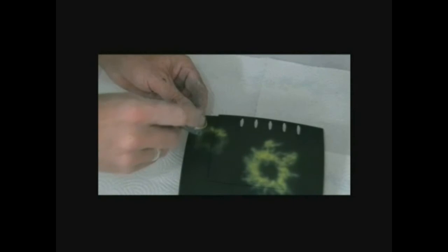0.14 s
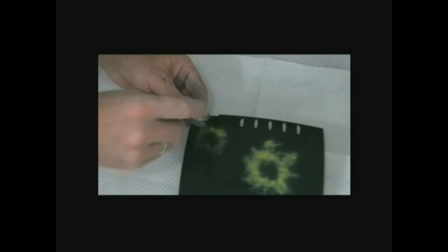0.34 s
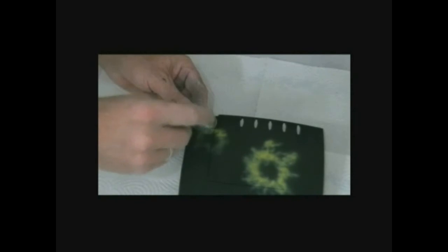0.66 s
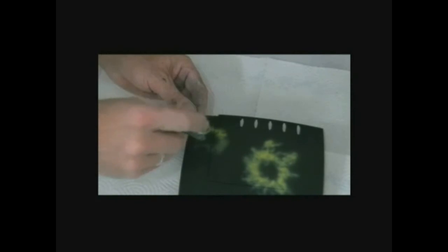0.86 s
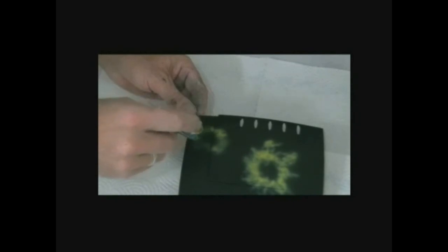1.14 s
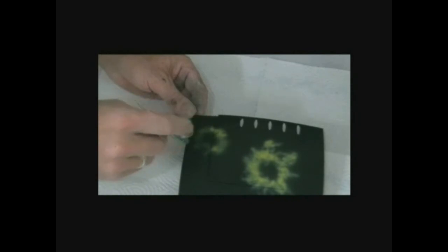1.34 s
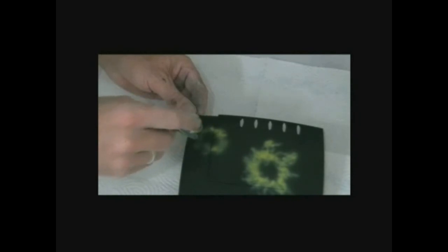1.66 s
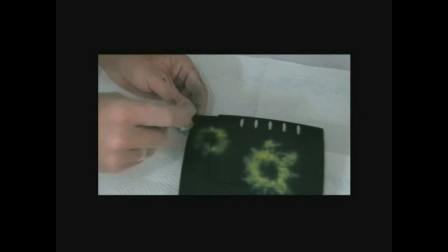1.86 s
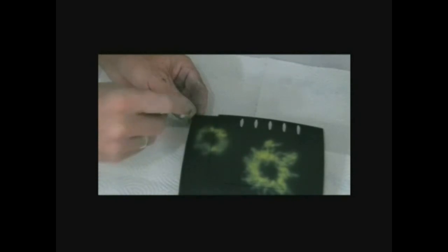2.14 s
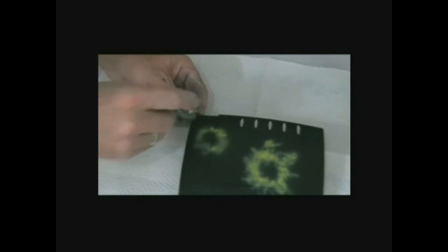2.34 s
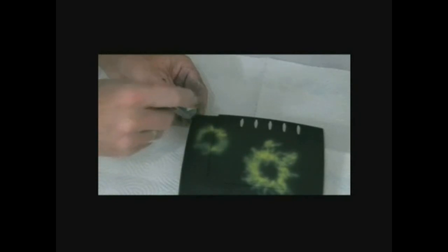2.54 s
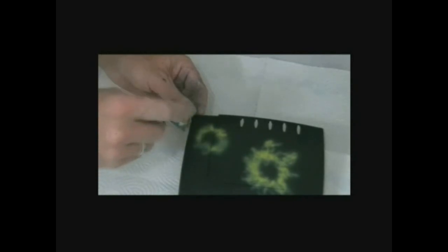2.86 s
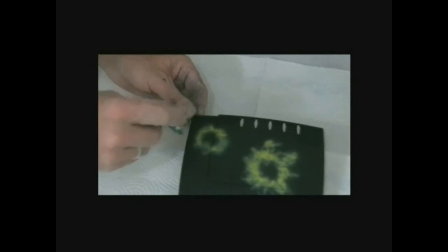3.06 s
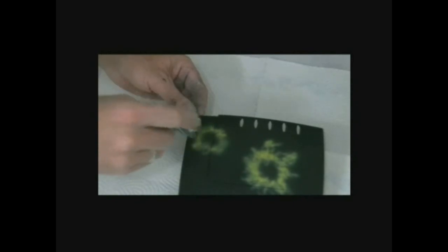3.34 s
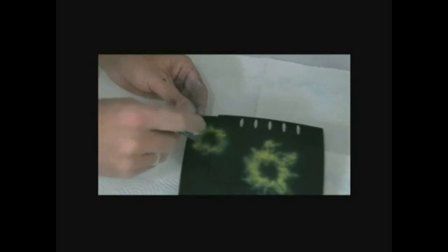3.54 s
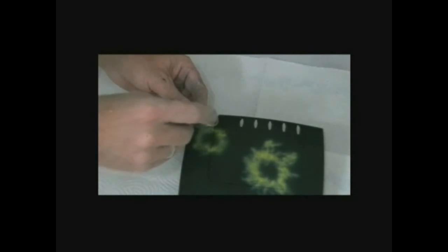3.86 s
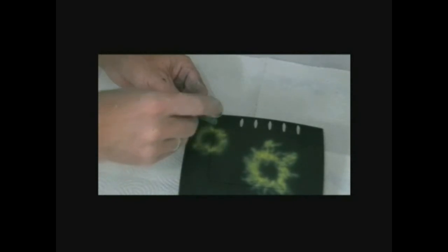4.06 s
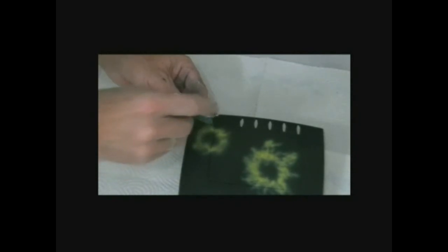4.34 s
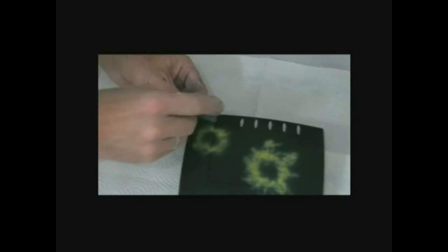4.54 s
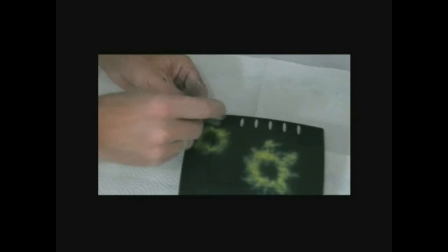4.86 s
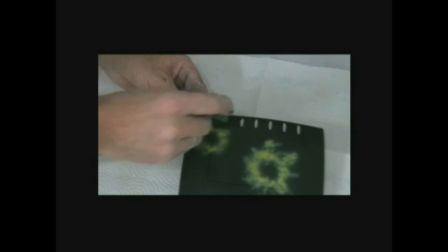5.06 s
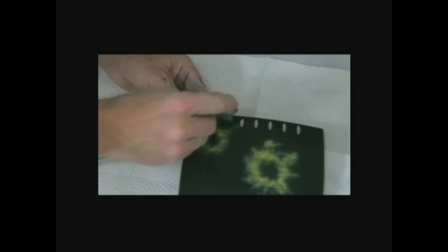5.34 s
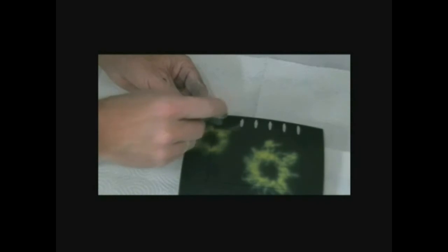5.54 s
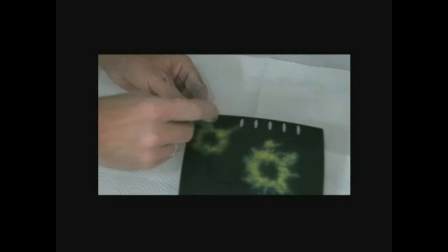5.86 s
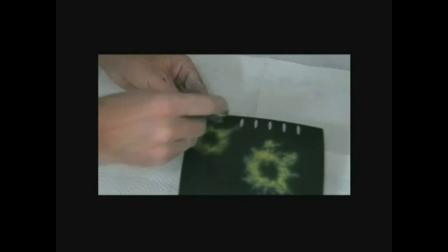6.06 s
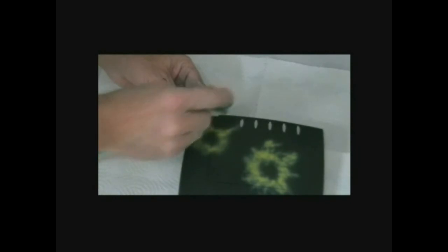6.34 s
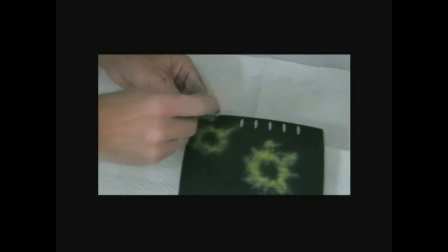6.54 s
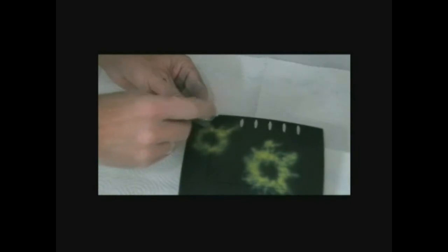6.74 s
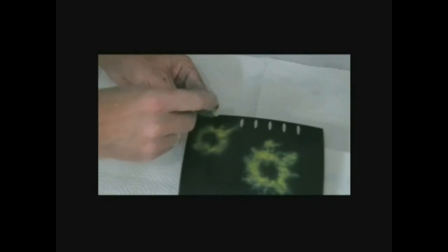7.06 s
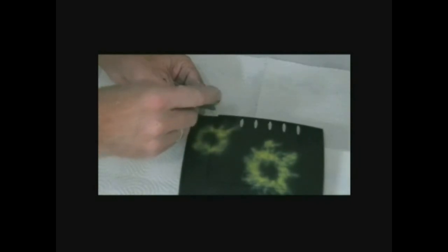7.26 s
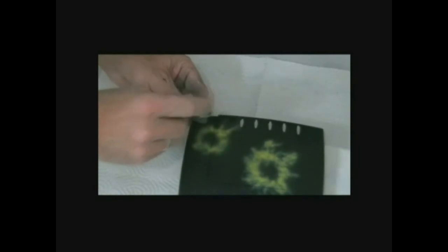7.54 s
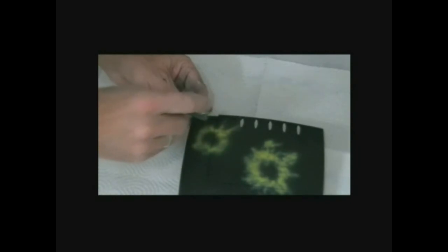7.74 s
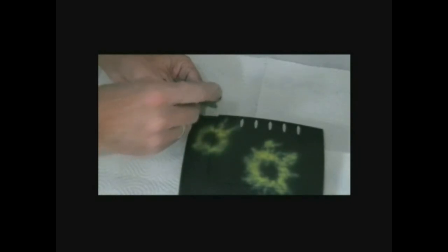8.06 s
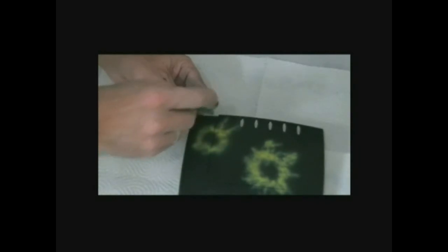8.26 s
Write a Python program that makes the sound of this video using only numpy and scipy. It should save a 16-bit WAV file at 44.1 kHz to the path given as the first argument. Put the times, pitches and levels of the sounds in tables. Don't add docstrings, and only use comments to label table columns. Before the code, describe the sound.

In a small quiet room, an airbrush sprays a long, steady, bright hiss with thin breathy whistles wavering inside it. After about four seconds it shuts off, then fires several short spurts with tiny gaps. Each spurt strikes a hollow plastic panel, adding a low-mid roar, a drumming flutter and sometimes a rasp. Close stereo pickup, with a short room tail and very faint hum beneath.

```python
import sys
import numpy as np
from scipy import signal
from scipy.fft import rfft, irfft, next_fast_len
from scipy.io import wavfile
from scipy.ndimage import uniform_filter1d, map_coordinates

SR = 44100
rng = np.random.default_rng(int(sys.argv[2]) if len(sys.argv) > 2 else 0)


def boost_factor(decibels):
    exponent = np.asarray(decibels, float) / 20
    return 10 ** exponent


def transcribe(u):
    v = np.clip(np.atleast_2d(u).T, -1, 1)
    q = np.round(v * 32767).astype(np.int16)
    wavfile.write(sys.argv[1], SR, q)


N = 370525
HZ = np.fft.rfftfreq(next_fast_len(N + SR), 1 / SR)


def on_hz(points, hz=HZ):
    f, v = np.transpose(points)
    return np.interp(np.log(hz + 1), np.log(f + 1), v)


def on_time(points, t):
    return np.interp(t, *np.transpose(points))


def shape(x, gain):
    return irfft(rfft(x, 2 * len(HZ) - 2) * gain)[..., :N]


def unit(x):
    return x / np.sqrt(np.mean(x ** 2))


def glide(control):
    return np.interp(np.arange(N) / SR * 1000, np.arange(len(control)), control)


def gain(db):
    return glide(boost_factor(db))


def power_db(power):
    return 10 * np.log10(power)


def walk(rate):
    k = int(SR / rate)
    steps = np.repeat(rng.standard_normal(N // k + 1), k)
    return unit(uniform_filter1d(uniform_filter1d(steps, k), k)[:N])


def turbulence(colour_db, eddy_db, eddy_hz):
    flutter = boost_factor(eddy_db * walk(rate=eddy_hz))
    return unit(shape(rng.standard_normal(N) * flutter, boost_factor(colour_db)))


# opens_s, opening_s, shuts_s, shutting_s, leak_after_db
TRIGGER_PRESSES = [
    (-1, .1, 4.400, .095, -33),
    (4.612, .13, 5.098, .085, -19.5),
    (5.243, .033, 5.662, .052, -26),
    (5.773, .042, 6.170, .1, -20),
    (6.312, .05, 6.580, .055, -31),
    (6.750, .07, 7.112, .042, -28),
    (7.233, .03, 9, .1, -30),
]


def valve(t):
    opens, opening, shuts, shutting, leak_db = np.transpose(TRIGGER_PRESSES)[..., None]
    rising = (t - opens) / opening
    falling = 1 - (t - shuts) / shutting
    ramp = np.clip(np.minimum(rising, falling), 0, 1).max(axis=0)
    latest = np.sum(t > opens + opening, axis=0) - 1
    return 20 * np.log10(ramp ** 1.6 + boost_factor(leak_db[latest, 0]))


# time_s, aim_into_hollow_db, nearness_to_face_db
CIRCLING_PATH = [(.1, -48, -47), (.28, -38, -42), (.5, -35.5, -43), (.72, -46, -45), (1.13, -39, -39),
                 (1.32, -41, -48), (1.57, -41, -37), (1.75, -40, -46), (1.98, -35, -42), (2.22, -36, -46),
                 (2.45, -31, -36), (2.82, -35, -43), (3.04, -34, -34), (3.26, -42, -44), (3.53, -39, -35),
                 (3.69, -45, -47), (3.99, -26, -31), (4.11, -27.5, -37)]
# time_s, aim_into_hollow_db, nearness_to_face_db
FLICK_PATHS = [
    [(4.22, -36, -42), (4.38, -26, -31.5), (4.45, -26, -32)],
    [(4.63, -38, -46), (4.73, -28.5, -33), (4.84, -28.5, -33), (4.97, -27.5, -25), (5.09, -22, -20),
     (5.14, -18.5, -22)],
    [(5.28, -20, -20), (5.36, -25, -26), (5.44, -24, -24), (5.6, -27, -34), (5.67, -33, -41)],
    [(5.83, -35, -42), (5.9, -28, -33), (5.97, -27, -30), (6.04, -25, -24), (6.17, -19.5, -19.5),
     (6.22, -21, -23)],
    [(6.37, -21, -23), (6.44, -23, -24), (6.48, -25, -31), (6.56, -27, -35), (6.6, -32, -38)],
    [(6.83, -33, -42), (6.9, -29, -38), (7.03, -24, -32), (7.08, -22, -29.5), (7.12, -22, -30)],
]
# time_s, aim_into_hollow_db, nearness_to_face_db
LAST_PATH = [(7.27, -26, -30), (7.32, -27, -34), (7.4, -28, -34), (7.6, -39, -41), (7.72, -31, -33),
             (7.83, -22.5, -31), (8.08, -23, -29.5), (8.19, -21.5, -27), (8.4, -38, -40)]


def jet_path(t):
    rest_db = -38
    s, aim_db, near_db = np.vstack([CIRCLING_PATH, *FLICK_PATHS, LAST_PATH]).T
    return np.interp(t, s, aim_db) - rest_db, np.interp(t, s, near_db) - rest_db


# peak_s, rise_s, fall_s, rasp_db
EDGE_CLIPS = [(3.350, 1.3, .25, -39), (5.070, .11, .14, -22.5), (5.282, .02, .04, -22),
              (5.430, .05, .08, -29), (6.075, .08, .16, -24.5), (6.385, .04, .06, -27)]


def edge_clips(t):
    peak, rise, fall, db = np.transpose(EDGE_CLIPS)[..., None]
    width = np.where(t < peak, rise, fall)
    return np.sum(boost_factor(2 * db) * np.exp(-((t - peak) / width) ** 2), axis=0)


# time_s, hiss_db
AIR_SUPPLY = [(0, -31), (2.4, -31.3), (3.3, -29.6), (3.75, -31.3), (4.3, -30.3), (4.8, -32.3), (5.05, -31),
              (5.4, -32.8), (6.35, -33), (6.6, -31.5), (7.6, -31.5), (7.8, -30), (8.4, -31.8)]


def hiss_level(t, open_db, aim, near, clips):
    flow_db = on_time(AIR_SUPPLY, t) - 0.13 * aim - 0.11 * near
    return open_db + power_db(boost_factor(2 * flow_db) + boost_factor(2 * -12.5) * clips)


# frequency_hz, level_db
HISS_COLOUR = [(25, -21), (60, -21), (150, -19.5), (500, -10.5), (1500, -8.5), (3500, -12.5), (6000, -2),
               (8600, -0.5), (11000, -3), (13300, -4), (14400, -9.5)]


def nozzle_hiss(hiss_db):
    return turbulence(on_hz(HISS_COLOUR), eddy_db=1.02, eddy_hz=301.8) * gain(hiss_db + 0.97)


# middle_s, half_length_s, frequency_hz, level_re_hiss_db
GAP_WHISTLES = [(.05, .25, 10000, -6), (.75, .2, 8250, -12), (1.45, .55, 8740, -9.5), (3.1, .5, 8780, -8.5),
                (3.72, .2, 9250, -10), (4.3, .4, 9300, -15), (6.5, 2.5, 9500, -19)]


def whistles(t, hiss_db):
    middle, half, hz, db = np.transpose(GAP_WHISTLES)[..., None]
    bells_db = db - 10 * ((t - middle) / half) ** 4
    gap_hz = uniform_filter1d(hz[bells_db.argmax(axis=0), 0], size=200)
    gap = whistle(glide(gap_hz), 300) * gain(hiss_db + bells_db.max(axis=0))
    cap_db = -14 - 10 * np.clip(1 - t / 2.1, 0, 1)
    cap = whistle(np.full(N, 6900), 320) * gain(hiss_db + cap_db)
    rim_db = -19 - 10 * ((t - 2.9) / .8) ** 4
    rim = whistle(np.full(N, 4720), 200) * gain(hiss_db + rim_db)
    return gap + cap + rim


def whistle(hz, width_hz):
    lowpass = signal.butter(2, width_hz / 2, fs=SR, output="sos")
    slow = signal.sosfilt(lowpass, rng.standard_normal((2, N)))
    turn = 2 * np.pi * np.cumsum(hz) / SR
    return unit(slow[0] * np.cos(turn) + slow[1] * np.sin(turn))


def ring_on(open_db, t, share, drop_db, fade):
    decay_db = np.maximum.accumulate(open_db + fade * t) - fade * t + drop_db
    return np.maximum(share * open_db, decay_db)


def hollow_ring(open_db, t):
    return ring_on(open_db, t, share=.66, drop_db=-4, fade=95)


def face_ring(open_db, t):
    return ring_on(open_db, t, share=.9, drop_db=-11, fade=130)


# centre_hz, width_hz, lift_db
PANEL_MODE_BELLS = [(566, 22, 4),
                    (767, 20, 4.5), (858, 9.4, 6.5), (982, 61, 2), (1034, 19, 6.5), (1129, 36, 7),
               (1233, 58, 1.5), (1275, 24, 5.5), (1354, 24, 6), (1426, 43, 4), (1561, 69, 5.5),
               (1970, 43, 3), (2045, 44, 0), (2200, 40, -0.5), (2310, 22, 1.5), (2495, 51, 2.5)]


def panel_modes():
    return sum(db / (1 + (2 * (HZ - hz) / width) ** 2) for hz, width, db in PANEL_MODE_BELLS)


# frequency_hz, level_db
BOOM_COLOUR = [(80, -38), (200, -16), (350, -7), (560, 0.5), (620, -3), (800, 2), (1000, -2.5), (1500, -30)]
# time_s, boom_db
BRUSH_LEAN = [(0, -2), (.5, 2.5), (.85, -5), (1.7, -4), (2.5, 1), (3.4, -7), (4.2, 1), (5.3, -1.5),
              (6.5, -1), (7.05, -1.5), (7.5, 4), (7.9, 1), (8.4, 5)]
# frequency_hz, level_db
ROAR_COLOUR = [(120, -55), (300, -40.5), (540, -26.5), (610, -21), (850, -8.5), (1270, -1.5), (1550, -8.5),
               (1800, -9.5), (2600, -27), (5000, -60)]


def panel_hollow(t, open_db, aim, near):
    hollow_db = hollow_ring(open_db, t)
    modes_db = panel_modes()
    roar_db = hollow_db - 38.3 + 1.02 * aim + 0.01 * near
    boom_db = hollow_db + on_time(BRUSH_LEAN, t) - 47 + 0.9 * aim - 0.55 * near
    roar = turbulence(on_hz(ROAR_COLOUR) + modes_db, eddy_db=0.44, eddy_hz=89.2) * gain(roar_db)
    boom = turbulence(on_hz(BOOM_COLOUR) + modes_db, eddy_db=1.0, eddy_hz=59.6) * gain(boom_db)
    return roar + boom


# frequency_hz, level_db
DRUM_COLOUR = [(900, -58), (1500, -10), (1800, -6), (2150, -0.5), (2400, -3), (2620, -2), (2900, -10.5),
               (3500, -13), (6000, -50)]


def panel_face(t, open_db, aim, near):
    drum_db = face_ring(open_db, t) - 37 - 0.01 * aim + 1.03 * near
    return turbulence(on_hz(DRUM_COLOUR) + panel_modes(), eddy_db=1.2, eddy_hz=120) * gain(drum_db)


# frequency_hz, level_db
RASP_COLOUR = [(1200, -38), (2400, -6.5), (3200, -2.5), (4200, -3), (4700, -0.5), (5300, -5), (7500, -11.5),
               (10500, -23), (14000, -62)]


def edge_rasp(t, open_db, aim, near, clips):
    steady_db = -35.5 - 0.15 * aim + 0.3 * near
    rasp_db = face_ring(open_db, t) + power_db(boost_factor(2 * steady_db) + clips)
    return turbulence(on_hz(RASP_COLOUR), eddy_db=1.0, eddy_hz=199.1) * gain(rasp_db)


# frequency_hz, level_db
HAND_COLOUR = [(500, -9), (3000, -10), (6000, 0.5), (8700, -2.5), (11000, 6.5), (14000, -36)]
# time_s, closeness_0_to_1
HAND_CLOSENESS = [(0, .02), (2.9, .08), (3.6, .6), (5.2, .55), (6, .95), (6.6, .55), (8.4, .55)]


def hand_echoes(t, jet):
    close = glide(on_time(HAND_CLOSENESS, t))
    far_ms, near_ms = .64, .315
    echo = lambda ms: boost_factor(on_hz(HAND_COLOUR)) * np.exp(-2j * np.pi * HZ * ms / 1000)
    far, near = shape(jet, [echo(far_ms), echo(near_ms)])
    return (-.09 - .25 * close) * far + .25 * close * near


# frequency_hz, level_db
TABLE_COLOUR = [(500, 0), (3000, 0), (6000, -0.5), (8700, -0.5), (14000, 6)]
TABLE_SHARES = [
    [0.76],
    [1.8],
]


def table_echo(jet):
    late_ms = .99 + .05 * walk(rate=2.5)
    reflected = shape(jet, boost_factor(on_hz(TABLE_COLOUR)))
    echo = map_coordinates(reflected, [np.arange(N) - late_ms * SR / 1000], order=3)
    return TABLE_SHARES * (.16 * echo)


# frequency_hz, room_re_direct_db
ROOM_COLOUR = [(60, -3), (300, -4.5), (800, -9), (1500, -9.5), (3000, -6), (6000, -3.5), (10000, -0.5),
               (12000, -0.5), (14000, -1)]
# frequency_hz, t60_s
ROOM_T60 = [(300, .5), (700, 0.5), (1100, 0.54), (2000, 0.35), (4000, 0.37), (12000, 0.15)]


def room(x, count=4):
    t = np.arange(SR // 3) / SR
    share = np.array([walk(rate=18) for _ in range(count)])
    share = share / np.sqrt(np.sum(share ** 2, axis=0))
    out = 0
    for part in share * x:
        tail = 0
        for hz in 44 * 2. ** np.arange(9):
            octave = signal.butter(2, [hz / 1.4, hz * 1.4], "band", fs=SR, output="sos")
            noise = signal.sosfilt(octave, rng.standard_normal((2, len(t))))
            fade = np.exp(-np.log(1000) * t / on_hz(ROOM_T60, hz)) * (t > .003)
            tail = tail + noise * fade / np.sqrt(np.sum(fade ** 2))
        out = out + rfft(part, 2 * len(HZ) - 2) * rfft(tail, 2 * len(HZ) - 2)
    return irfft(out * boost_factor(on_hz(ROOM_COLOUR)))[:, :N]


# frequency_hz, level_db
FLOOR_COLOUR = [(25, -22), (60, -8), (150, -3.5), (300, 2.5), (1000, -5.5), (3000, -16), (8000, -19),
                (14000, -27)]


def background(spray):
    hum_hz, hum_db, floor_db = 100, -67, -55
    tone = np.sqrt(2) * np.sin(2 * np.pi * hum_hz * np.arange(N) / SR)
    hum = boost_factor(hum_db + 1.0 * walk(rate=3)) * tone
    noise = rng.standard_normal((3, N))
    floor = boost_factor(floor_db) * unit(shape(noise[0] + 1.1 * noise[1:], boost_factor(on_hz(FLOOR_COLOUR))))
    loudness = uniform_filter1d(spray ** 2, size=SR // 4) / boost_factor(2 * -22.)
    return (hum + floor) / (1 + loudness) ** 0.17


def scene():
    t = np.arange(0, N / SR, .001)
    open_db = valve(t)
    aim, near = jet_path(t)
    clips = edge_clips(t)
    hiss_db = hiss_level(t, open_db, aim, near, clips)
    jet = nozzle_hiss(hiss_db) + edge_rasp(t, open_db, aim, near, clips)
    spray = jet + panel_hollow(t, open_db, aim, near) + panel_face(t, open_db, aim, near)
    near_field = spray + whistles(t, hiss_db) + hand_echoes(t, jet)
    return near_field + table_echo(jet) + room(spray) + background(spray)


def low_pass(x):
    return signal.sosfilt(signal.butter(12, 14760, fs=SR, output="sos"), x)


# frequency_hz, left_minus_right_db
PORT_LEVELS = [(30, 2), (110, 1.5), (200, 3), (370, 3), (680, 3), (1250, -0.1), (2290, -0.5), (4200, -1.5),
               (7720, -1.6), (14200, 0.3)]
# frequency_hz, left_lead_rad
PORT_PHASES = [(0, 0), (1030, -0.17), (2760, -0.49), (3190, -0.65), (5770, -0.19), (8960, -0.2),
               (10600, 0.3), (14300, -0.1)]
# from_s, to_s
TOP_BAND_SPANS = [(-1, 1.85), (1.9, 2), (2.05, 2.3), (2.37, 2.5), (2.62, 2.98), (3.01, 3.07), (3.15, 4.33),
                  (5.78, 5.92), (8.33, 9)]


def record(dry):
    half = np.array([[.5], [-.5]])
    ports = boost_factor(half * on_hz(PORT_LEVELS)) * np.exp(1j * half * on_hz(PORT_PHASES))
    edges_hz = 12400, 13600, 14330
    low, upper, whole = shape(dry, [ports / np.sqrt(1 + (HZ / edge) ** 1200) for edge in edges_hz])
    t = np.arange(N) / SR
    top_open = sum((t > start) * (t < end) for start, end in TOP_BAND_SPANS)
    upper_power = uniform_filter1d(np.mean((upper - low) ** 2, axis=0), size=2048)
    upper_open = upper_power > boost_factor(2 * -60)
    fade = lambda gate: uniform_filter1d(1. * gate, size=1024)
    mix = low + fade(upper_open) * (upper - low) + fade(top_open) * (whole - upper)
    return low_pass(mix)


dry = scene()
out = record(dry)
transcribe(out)
```